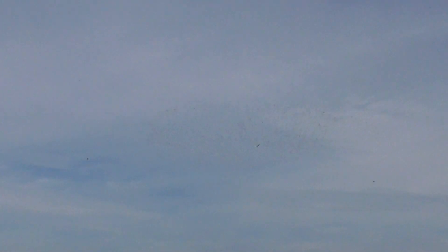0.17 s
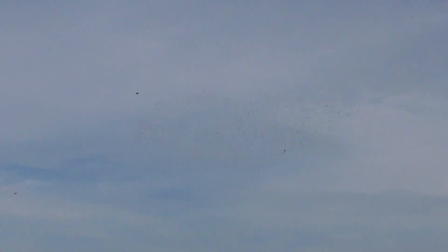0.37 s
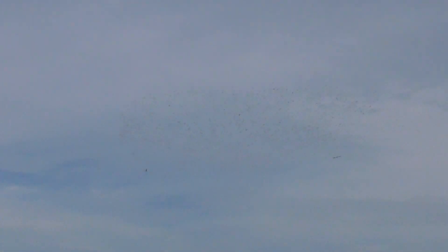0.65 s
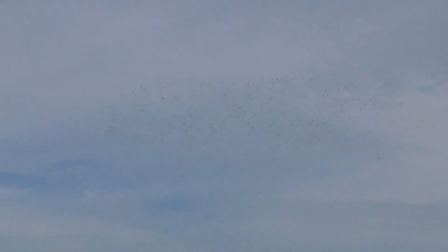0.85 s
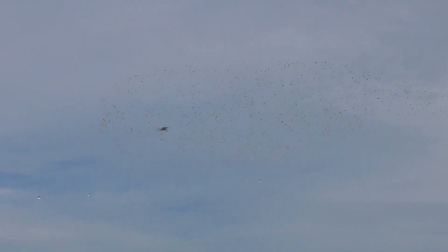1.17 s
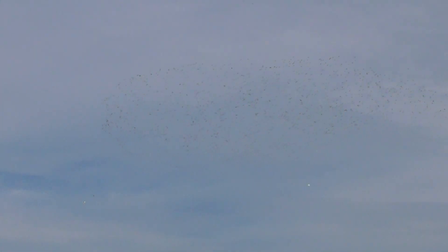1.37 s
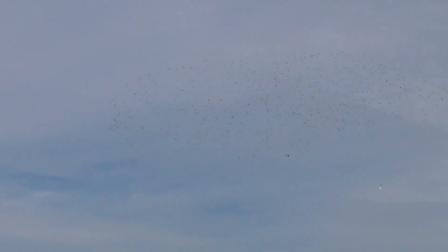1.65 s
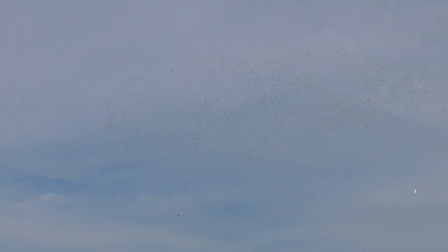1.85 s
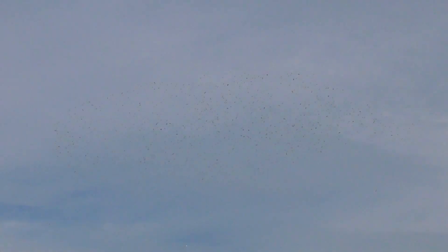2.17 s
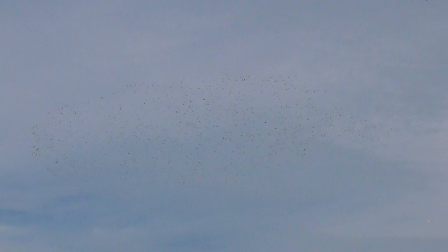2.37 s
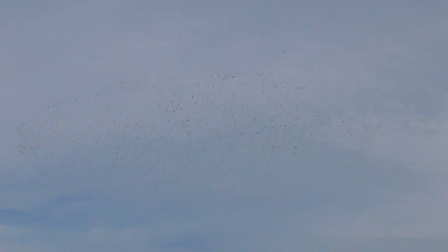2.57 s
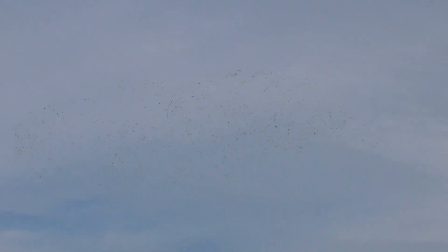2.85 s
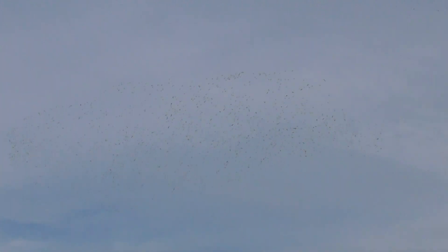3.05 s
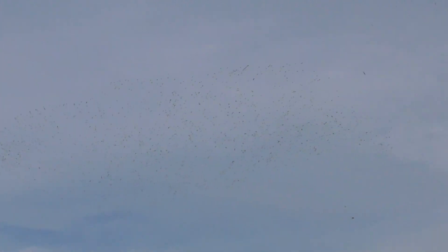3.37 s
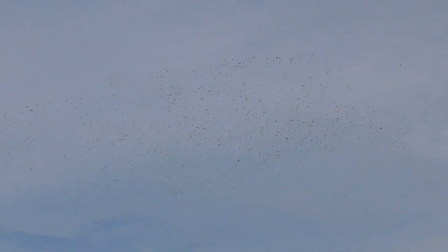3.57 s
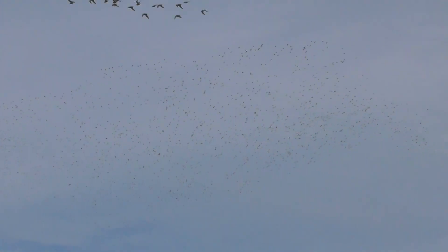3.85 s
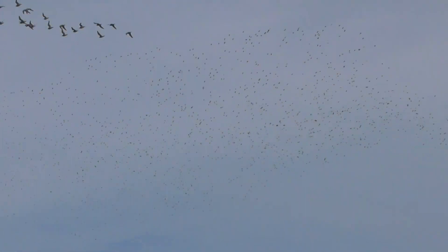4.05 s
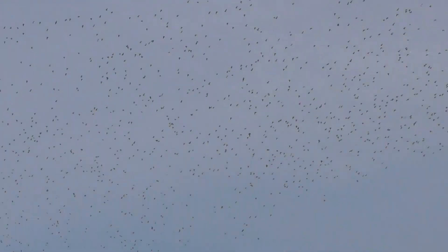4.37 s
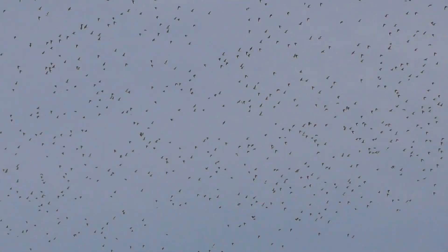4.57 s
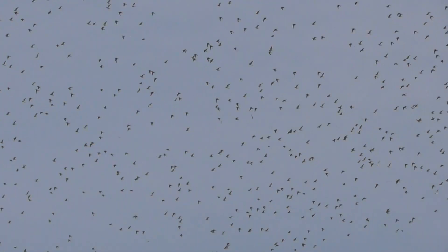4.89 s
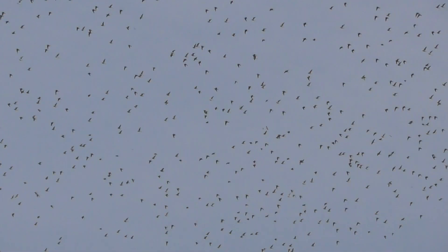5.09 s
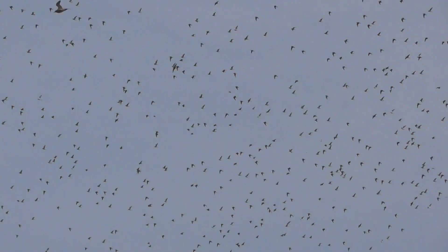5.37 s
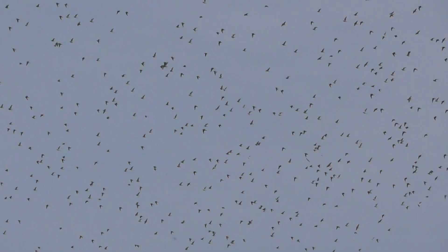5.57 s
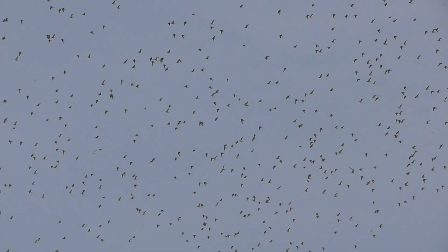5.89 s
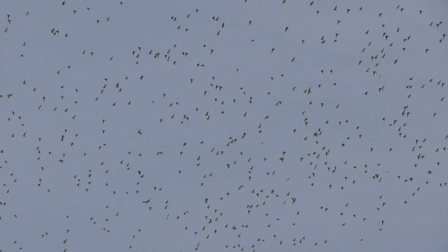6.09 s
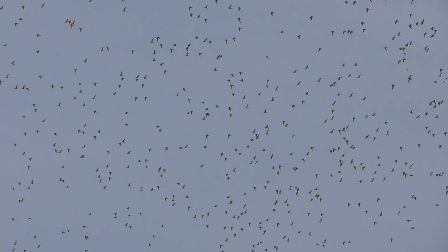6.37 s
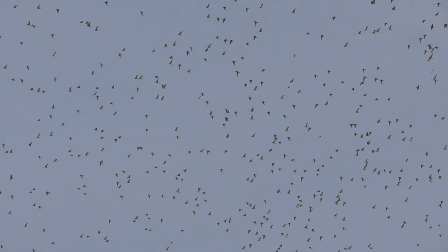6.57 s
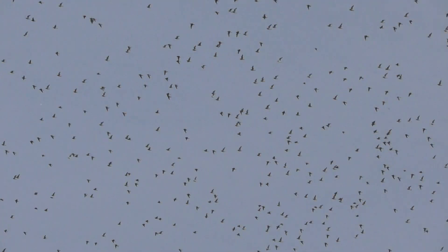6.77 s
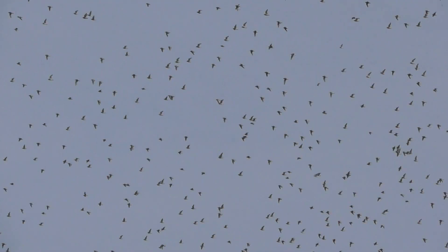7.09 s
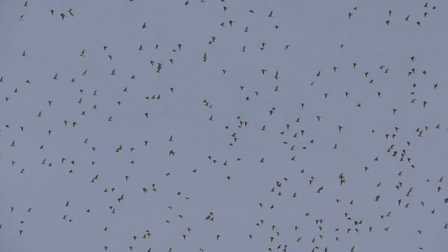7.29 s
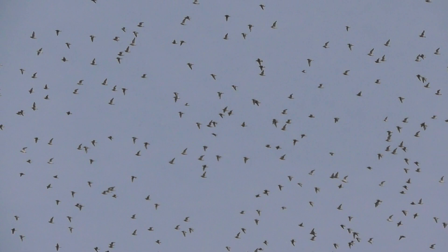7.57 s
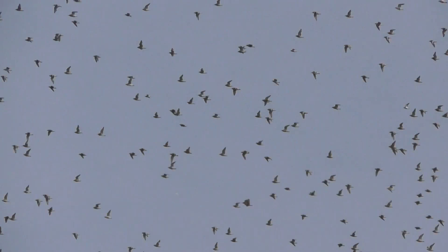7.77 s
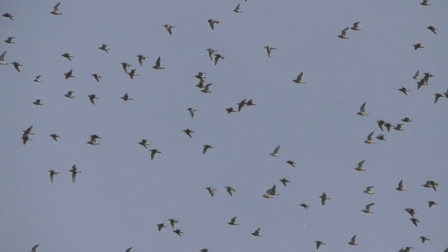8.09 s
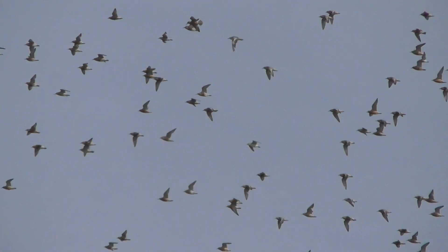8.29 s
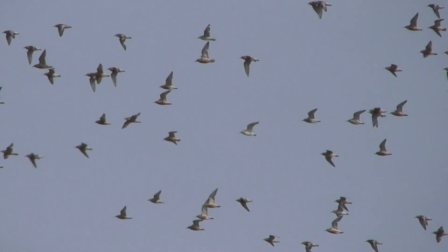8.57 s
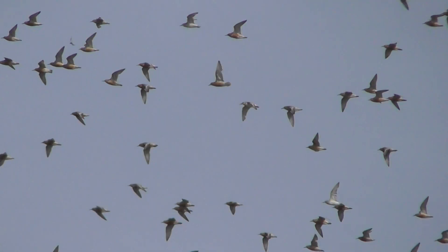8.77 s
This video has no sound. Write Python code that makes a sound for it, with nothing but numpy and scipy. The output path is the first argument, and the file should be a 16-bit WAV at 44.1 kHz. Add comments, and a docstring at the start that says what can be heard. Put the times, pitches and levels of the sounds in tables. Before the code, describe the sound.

An open marsh heard through a handheld stereo microphone, with soft hiss and an airy wash of distant, blurred bird calls throughout. From 0 to 2.5 s wind buffets in strong, low, lumpy gusts with dull one-sided thumps; a very sharp click snaps at 0.1 s, with a cluster of plastic ticks and finger rustle around 1.1-1.7 s. Faint thin whistles and a low trill sit behind. A clear, high piping whistle stands out at 2.7 s. Wind weakens unevenly, with thumps near 3.2-3.7 s; more casing ticks come at 2.9, 3.3 and 4.3-4.9 s, the strongest near 4.8. From 4.5 s calls thicken: a rippling trill at 4.7, overlapping trills and falling whistles at 5.6-6 s, trills around 7 s, purrs at 6.2-8 s. A lone tick sounds at 7.4. Loud bright trills at 8.2 and 8.4 s lead to final whistles; slight high fizz lingers.

```python
"""An open marsh: a flock of shorebirds whistles, trills and purrs above a handheld camera.
Each bird call is a stack of sine waves on a moving pitch; faint far calls and echoes lie behind.
Wind is drifting noise with dull thumps; the camera body ticks as decaying tones and rustles in tiny slips.
An airy marsh wash, microphone hiss and a patchy high fizz are noises of different colours."""
import sys
import numpy as np
from scipy import signal
from scipy.fft import rfft, irfft
from scipy.io import wavfile
from scipy.ndimage import uniform_filter1d

SR = 44100
rng = np.random.default_rng(int(sys.argv[2]) if len(sys.argv) > 2 else 0)


def bounce(signal):
    """Save signal as a 16-bit WAV file at the path given by the first command-line argument."""
    frames = np.transpose(np.atleast_2d(signal))
    limited = np.clip(frames, -1, 1)
    pcm = np.round(limited * 32767).astype(np.int16)
    wavfile.write(sys.argv[1], SR, pcm)


N = 394254  # length in samples

# In every table, left_right_db above 0 means louder on the left.
# gusts of wind: [start_s, level_db before the tint below]
GUSTS = [(0.0, -30), (0.77, -29), (0.97, -34.5), (1.04, -26), (1.34, -30), (1.39, -24), (1.67, -46.5),
         (1.97, -55), (2.06, -34), (2.11, -42), (2.24, -24.5), (2.31, -27), (2.61, -34), (2.76, -56),
         (3.21, -38.5), (3.24, -34), (3.36, -42.5), (3.39, -36.5), (3.78, -28.5), (4.11, -45),
         (4.21, -36.5), (4.58, -42.5), (4.73, -37.5), (5.38, -37.5), (5.4, -47), (5.48, -40), (5.7, -45.5),
         (6.05, -36), (6.25, -45.5), (6.94, -35), (7.42, -35), (7.45, -45), (7.55, -38.5), (7.97, -39.5),
         (8.02, -33), (8.17, -43), (8.71, -41.5), (8.94, -39.5)]
# basic colour of the wind: [pitch_hz, relative level_db per Hz]
WIND_COLOUR = [(8.8, -78), (15, -56), (27, -48), (38, -58), (59, -100), (87, 0), (188, 13.5), (372, 4),
               (754, -10.5), (1210, -30), (2500, -51.5), (3250, -71), (5500, -120)]
# changing tint of the wind: [time_s, deep_bass_lift_db, upper_edge_lift_db]
WIND_TINT = [(0, -18, 12), (1.45, -14, 5), (1.8, 15, 23), (2.4, -11, -1.5), (2.9, 30, 7), (3.6, 6.5, -1.5),
             (4.8, 21, 7.5), (6.0, 16, -12.5), (6.4, 33, -13), (7.0, 28.5, -17), (8.94, 35.5, -16)]
# how alike the wind is at both ports: [pitch_hz, likeness 0-1]
WIND_LIKENESS = [(30, 0.21), (130, 0.97), (290, 0.37), (640, 0.0083), (1500, 0.024)]
WIND_LEFT_RIGHT_DB = 0.46

# colour of the marsh wash: [pitch_hz, relative level_db per Hz]
WASH_COLOUR = [(180, -49), (300, -8), (416, 12), (801, 2.5), (1110, -3), (1230, -11), (1590, 0.5),
               (2200, -7), (3140, -11.5), (4480, -7.5), (5630, -20.5), (7270, -10), (9000, -21),
               (11700, -74), (19800, -120)]
# loudness of the marsh wash: [time_s, level_db]
WASH_LEVEL = [(0, -57), (1.0, -55), (1.3, -52), (1.52, -51), (1.6, -56.5), (2.05, -56.5), (2.5, -54),
              (3.0, -57.5), (3.2, -58.5), (4.2, -59), (4.77, -53.5), (5.45, -58), (5.8, -55), (6.9, -56),
              (7.1, -52), (8.1, -53.5), (8.94, -54)]
# how alike the wash is on left and right: [pitch_hz, likeness 0-1]
WASH_LIKENESS = [(400, 0.44), (1000, 0.83), (1800, 0.97), (4000, 1)]

# colour of the microphone hiss: [pitch_hz, relative level_db per Hz]
HISS_COLOUR = [(2350, -71), (4000, -65), (7910, -12), (8250, -3.5), (9280, 1.5), (13200, 0), (15800, 1.5),
               (16200, -21), (16500, -36)]
HISS_START_DB, HISS_RISE_DB_PER_S = -65.5, 0.1

# loudness of the high fizz: [time_s, level_db]
FIZZ_LEVEL = [(0, -78), (4.5, -77), (5.5, -77), (6.5, -72), (7.2, -68.5), (7.8, -72), (8.4, -69),
              (8.94, -70)]
FIZZ_HZ, FIZZ_WIDTH_HZ = 13300, 800

# near whistles: [start_s, length_s, middle_pitch_hz, start_to_end_glide_hz, level_db, octave_overtone_db]
WHISTLES = [(0.002, 0.053, 2350, 208, -51.5, -35), (0.024, 0.11, 3200, -130, -53, -23),
            (0.28, 0.052, 3330, 2, -60, -25), (0.425, 0.049, 2480, 60, -65, -25),
            (0.514, 0.016, 2840, -40, -58, -25), (0.845, 0.042, 3300, 30, -64, -30),
            (0.965, 0.027, 3930, -50, -58, -30), (1.088, 0.023, 4330, 52, -54, -30),
            (1.206, 0.03, 3370, -100, -58, -30), (1.45, 0.04, 4180, -200, -59, -30),
            (0.376, 0.07, 3350, -200, -58, -21), (0.769, 0.15, 3070, 55, -60.5, -22),
            (1.484, 0.12, 3240, -38, -62, -23), (1.774, 0.067, 3410, -42, -62.5, -5),
            (2.672, 0.11, 3110, -13, -43, -12), (3.152, 0.13, 3800, -200, -70, -30),
            (3.58, .05, 2400, 150, -65, -30), (3.468, 0.16, 3260, -19, -61, -9),
            (3.682, 0.18, 3340, -140, -60, -11), (4.278, 0.12, 3090, -150, -61, -30),
            (4.907, .07, 4650, -500, -68, -28), (4.44, 0.13, 3420, -27, -60.5, -8),
            (4.66, 0.21, 3020, -190, -54.5, -30), (4.898, 0.042, 2280, -150, -66, -30),
            (4.884, 0.19, 3220, -120, -58, -31), (5.107, 0.14, 2310, 172, -62, -23),
            (5.15, 0.039, 3470, 60, -60, -25), (5.135, 0.035, 5120, -150, -62, -26),
            (5.287, 0.048, 2250, 195, -56.5, -20), (5.443, 0.12, 3410, 170, -62, -32),
            (5.659, 0.17, 2670, -420, -51, -12), (5.854, 0.097, 2237, 123, -52, -8),
            (5.905, 0.19, 3195, -230, -50.5, -17), (6.281, 0.14, 2720, -160, -55.5, -19),
            (6.564, 0.11, 2910, -350, -63, -28), (6.565, 0.13, 3420, -91, -57, -33),
            (6.687, 0.074, 3030, -450, -60, -31), (6.714, 0.085, 4720, 148, -69, -30),
            (6.797, 0.12, 3780, -350, -74, -30), (7.098, 0.14, 3130, -57, -53, -26),
            (7.168, 0.073, 2700, -180, -55, -10), (7.484, 0.13, 2580, 31, -59.5, -13),
            (7.735, 0.16, 3490, -22, -53.5, -22), (7.9, 0.053, 2860, -130, -56, -30),
            (7.969, 0.115, 2990, -220, -59, -32), (7.987, 0.041, 3590, -100, -56, -15),
            (8.145, 0.05, 2870, -170, -54, -32), (8.222, 0.13, 2820, -250, -53.5, -9),
            (8.613, 0.12, 3330, -150, -53.5, -31), (8.706, 0.072, 4380, -60, -71, -29),
            (8.732, 0.083, 2870, 18, -59, -32)]
LEAD_S = .022  # low lead-in before each whistle
ARCH = .045  # share of the pitch by which whistle ends sag, up to 0.16 s long; longer ones are flatter
WAVER_DB_PER_DB = 0.11  # fainter near whistles waver more

# usual pitches of far whistlers: [pitch_hz]
FAR_PITCHES = np.array([1900, 2400, 2800, 3200, 3300, 3600, 4400])
FAR_WHISTLES_PER_S, FAR_WHISTLE_BASE_DB = 260, -73
FAR_TRILLS, FAR_TRILL_BASE_DB = 40, -67
FAR_PURRS, FAR_PURR_BASE_DB = 60, -70

# camera ticks: [start_s, sharp_peak_db, hollow_over_sharp_db, shell_over_sharp_db, left_right_db]
TICKS = [(0.081, -12, -22.5, -22, -1), (0.165, -53, 17, 20, 0.1), (0.6976, -70.5, 35, 22, 0),
         (1.114, -21, -6.5, -3.5, -2), (1.1751, -28.5, -10, -3.5, 0.1), (1.213, -43, -11, -8, -1),
         (1.327, -37, -15, -4, 1), (1.3463, -37, -12, -14, 2), (1.3727, -25.5, -29, -21, 0.5),
         (1.3827, -36, -20, -20, 1), (1.648, -42, -8, 11, 0.5), (1.665, -41, -22, 2, -1),
         (2.15, -32.5, -13, 0.5, -4.0), (2.1958, -43, 6, 4, -5), (2.612, -37.5, -3, 5, -3.5),
         (2.9169, -29.5, -5.5, 3.5, -2.5), (3.301, -28.5, -8.5, -4, -3.5), (3.319, -43, -14, -5, -4),
         (4.3236, -28.5, -4.5, 3.5, -3), (4.3585, -41, -5, 3, -1), (4.4138, -42, -12, -19, -7),
         (4.5322, -41.5, -20, -3, -7), (4.653, -40, -19, -1, 2), (4.7484, -40, 1, -4, 8),
         (4.7745, -40, -16, -9, 2), (4.7877, -22, -1, -6.5, -4), (4.8968, -45, -18, -11, -3),
         (7.4139, -30, 4.5, 11, -3.5)]
# ringing tones of the camera body: [pitch_hz, level_db, time_to_fall_60_db_s, part: 0 sharp, 1 hollow, 2 shell]
BODY_TONES = [(6500, -9, .007, 0), (7550, 0, .011, 0), (8450, -5, .008, 0), (9900, -15, .004, 0),
              (13000, -22, .003, 0), (660, -7, .03, 1), (830, 0, .038, 1), (1080, -6, .02, 1),
              (1750, -2, .015, 2), (2020, 0, .018, 2), (2800, -1, .015, 2), (3300, -4, .012, 2),
              (3800, -2, .015, 2), (4670, -2, .016, 2)]
HOLLOW_RISE_S = 0.0015

# near trills: [start_s, notes, note_period_s, held_pitch_hz, last_note_hz, level_db,
#               brightness_db per overtone, third_overtone_lift_db, rasp 0-1]
TRILLS = [(.133, 1, 0.14, 1806, 1825, -60, -4.5, 1, 0.34),
          (.780, 7, 0.033, 1920, 1680, -62.5, -0.8, 8, 0.3),
          (1.091, 6, 0.03, 1495, 1434, -52, -11.5, 11, 0.43),
          (2.155, 7, 0.031, 1910, 1700, -64, 1.5, -1, 0.05),
          (4.655, 7, 0.031, 1907, 1736, -53.5, -3.5, 0, 0.07),
          (5.632, 7, 0.034, 1503, 1426, -54, -5.5, 7, 0.3),
          (5.644, 8, 0.0322, 1955, 1704, -49, -3.5, 0, 0.21),
          (6.69, 1, 0.042, 1300, 1320, -54, -4, -3, 0.1), (6.926, 8, .0335, 1897, 1590, -52, -3.5, 2, 0.05),
          (7.250, 7, 0.025, 1507, 1425, -58, -1.5, 6.5, 0.26),
          (8.196, 7, 0.0327, 1935, 1628, -44.5, -3.5, -4.5, 0.06),
          (8.427, 7, 0.029, 1353, 1244, -47.5, -2.5, -3, 0.4)]
# basic strengths of a trill's overtones, from the lowest tone up: [level_db]
TRILL_OVERTONES = [-15.5, -2.5, -5, -5, -16]
CLIMB, SAG_POWER = 0.208, 4.2  # the first note sits this share of the final drop low; the drop comes late
UNEVEN = .04  # typical share of a period by which notes come early or late
CRACK = .12  # share of the pitch by which the last note starts too high
TRILL_FADE_DB, TRILL_DULL_DB = 0.5, -1  # fade, and brightness change per overtone, over the trill
SLIDE_FADE_DB_PER_SHARE = 35  # a note fades as it slides down

# hard eddies of wind: [start_s, peak_db, left_right_db]
THUMPS = [(0.241, -31, -11), (0.286, -27, -6), (0.398, -45, 0.1), (0.477, -37, -3), (0.649, -24, 2),
          (1.086, -46, .5), (1.463, -23, 10), (2.078, -35, -5), (2.384, -32, -2), (3.234, -26.5, -3),
          (3.602, -29.5, 9), (3.729, -26.5, 10), (5.342, -40, -1), (6.154, -34.5, 4), (6.604, -31, 8),
          (6.655, -31.5, 9), (6.725, -34, 8)]

# near purrs: [start_s, length_s, low_pitch_hz, level_db]
PURRS = [(4.5, 0.16, 2600, -51), (0.29, 0.1, 3900, -61), (1.17, 0.09, 3700, -56), (1.25, 0.22, 2700, -62),
         (0.56, 0.074, 1570, -54.5), (0.99, 0.11, 2800, -59), (4.491, 0.31, 1570, -64),
         (6.233, 0.31, 1520, -58.5), (6.814, 0.31, 1770, -59), (7.503, 0.48, 1550, -57.5)]
CHIRPS_PER_S, CHIRP_RISE_HZ = 57, 604  # the rise is reached 0.7 of the way through a chirp period

# fingers shifting their grip: [start_s, length_s, level_db]
RUBS = [(1.17, 0.067, -74), (1.31, 0.16, -62), (1.447, 0.073, -53.5), (2.12, 0.26, -65), (2.56, 1, -70),
        (4.276, 0.73, -62.5), (6.388, 0.09, -65)]

# how far the left port leads the right: [pitch_hz, lead in radians]
PORT_LEAD = [(300, 0), (600, -.5), (1500, 0), (8500, 0), (10500, 2.4), (11600, 2.3), (13300, .5),
             (15000, 1.1)]
TREBLE_LIMIT_HZ = 15830


def amp(db):
    """Turn decibels into a plain multiplier."""
    return 10 ** (np.asarray(db) / 20)


def evened(x):
    """Scale a signal to an average strength (rms) of 1."""
    return x / np.sqrt(np.mean(x ** 2) + 1e-20)


def smoothed(x, *sizes, axis=-1):
    """Smooth by one running average after another."""
    for size in sizes:
        x = uniform_filter1d(x, size=size, axis=axis)
    return x


def read(points, hz):
    """Read a table between its points on a musical (logarithmic) pitch scale."""
    f, value = np.transpose(points)
    return np.interp(np.log(hz + 1), np.log(f + 1), value)


def along(table, column, t):
    """Read one column of a table between its times."""
    columns = np.transpose(table)
    return np.interp(t, columns[0], columns[column])


def add(mix, s, sound, left_right_db=-0.8):
    """Place a sound at s seconds, trimmed to fit and shared between left and right."""
    at = round(s * SR)
    part = mix[:, max(at, 0):at + len(sound)]
    sides = amp([[left_right_db / 2], [-left_right_db / 2]])
    part += sound[max(-at, 0):][:part.shape[1]] * sides


def colour(points, hz):
    """Scale a spectrum so that noise made from it has rms 1."""
    db = read(points, hz)
    return db - 10 * np.log10(np.sum(amp(db) ** 2) * 2 / 3)


def noise(field_db, likeness, size, patchy_db, flicker_db):
    """Two-port noise shaped over pitch and time, with drifting patches and broad flicker."""
    frames, hz = 4 * N // size + 5, np.fft.rfftfreq(size, 1 / SR)
    a, b, c, d, patches = rng.standard_normal((frames, len(hz), 5)).T
    patches = smoothed(patches, 6, axis=0)
    patches = evened(smoothed(patches, 8, axis=1))
    flicker = evened(smoothed(rng.standard_normal(frames), 3))
    same = np.clip(likeness(hz), -1, 1)[:, None]
    left = a + 1j * b
    right = same * left + np.sqrt(1 - same ** 2) * (c + 1j * d)
    t = np.arange(frames) * size / 4 / SR
    level_db = field_db(hz[:, None], t) + patchy_db * patches + flicker_db * flicker
    ports = np.array([left, right]) * amp(level_db)
    return signal.istft(ports, nperseg=size, noverlap=size * 3 // 4)[1][:, :N]


def wind():
    """Eddies buffet the ports: deep noise stays smooth while the rest swells in quick lumps."""
    def field(hz, t):
        octaves = np.log2((hz + 1) / 200)
        bright_db = along(WIND_TINT, 2, t) * np.clip(octaves / 3.94, 0, 1.4)
        deep_db = along(WIND_TINT, 1, t) * np.clip(-octaves / 2.45, 0, 1)
        return colour(WIND_COLOUR, hz) + along(GUSTS, 1, t) + bright_db + deep_db
    rush = noise(field, lambda hz: read(WIND_LIKENESS, hz), size=1024, patchy_db=1.5, flicker_db=1.0)
    lumps = evened(smoothed(rng.standard_normal(N), 300, 200))
    deep = signal.sosfiltfilt(signal.butter(3, 115, fs=SR, output="sos"), rush)
    sides_db = WIND_LEFT_RIGHT_DB * np.array([[.5], [-.5]])
    return deep + (rush - deep) * amp(2.79 * lumps + sides_db)


def marsh():
    """Wings, water and far calls blur into one noise wash, its treble nearly the same on left and right."""
    def field(hz, t):
        return colour(WASH_COLOUR, hz) + along(WASH_LEVEL, 1, t)
    return noise(field, lambda hz: read(WASH_LIKENESS, hz), size=512, patchy_db=2.5, flicker_db=1.1)


def hiss():
    """Each microphone adds almost wholly its own hiss, which creeps up slowly."""
    def field(hz, t):
        return colour(HISS_COLOUR, hz) + HISS_START_DB + HISS_RISE_DB_PER_S * t
    return noise(field, lambda hz: 0.036 + 0 * hz, size=512, patchy_db=0.0, flicker_db=1.8)


def fizz():
    """A narrow band of high noise comes and goes in patches."""
    band = [(0, -90), (FIZZ_HZ - 2 * FIZZ_WIDTH_HZ, -40), (FIZZ_HZ - FIZZ_WIDTH_HZ, -5), (FIZZ_HZ, 0),
            (FIZZ_HZ + FIZZ_WIDTH_HZ, -5), (FIZZ_HZ + 3 * FIZZ_WIDTH_HZ, -25), (SR / 2, -60)]

    def field(hz, t):
        return colour(band, hz) + along(FIZZ_LEVEL, 1, t)
    return noise(field, lambda hz: 0.5 + 0 * hz, size=512, patchy_db=2.5, flicker_db=4.5)


def voice(hz, overtones_db, waver_db):
    """A bird's voice box sounds a pitch and its overtones; turbulent air makes each one waver."""
    turn = 2 * np.pi * (np.cumsum(hz) / SR + rng.random())
    waver = rng.standard_normal((len(overtones_db), len(hz) + 600))
    waver = evened(smoothed(waver, 300))[:, 300:-300]
    tones = [amp(db + waver_db * waver[k]) * np.sin((k + 1) * turn) for k, db in enumerate(overtones_db)]
    return np.sqrt(2) * sum(tones)


def whistle(length, pitch_hz, glide_hz, db, octave_db, waver_db=2.0, arch=None):
    """A soft low lead-in jumps up to an arched note that drops off at the end."""
    t = np.arange(-LEAD_S, length + .017, 1 / SR)
    u = np.clip(2 * t / length - 1, -1, 1)  # -1 at the start of the note, 1 at its end
    if arch is None:
        arch = ARCH * min(.16 / length, 1) ** 3
    lead = (-t / LEAD_S).clip(0)
    drop = ((t - length + 0.00352) / 0.01596).clip(0)
    hz = pitch_hz * (1 - arch * abs(u) ** 2.8) + glide_hz / 2 * u
    hz *= 1 - .32 * lead ** .45 - .3 * drop ** 1.3
    swell_db = -3.0 * u ** 2 - 9.0 * lead ** .45 - 7 * drop
    tone = voice(hz, [0, octave_db, 2 * octave_db], waver_db)
    return amp(db + swell_db) * tone * signal.windows.tukey(len(t), .08)


def far_flock(out):
    """Many faint calls at random times, deep in the flock."""
    for when, long, pitch, rise, fall, loud, side in rng.random((round(FAR_WHISTLES_PER_S * N / SR), 7)):
        hz = FAR_PITCHES[int(pitch * len(FAR_PITCHES))] * (.88 + .24 * side)
        s = when * N / SR
        swell_db = .9 * (along(WASH_LEVEL, 1, s) + 54)  # the far calls swell with the wash
        air_db = -12 * max(hz / 3000 - 1, 0) * 1.1  # air dulls high calls
        db = FAR_WHISTLE_BASE_DB + 7 * loud + swell_db + air_db
        glide_hz = hz * (.08 * rise - .14 * fall)
        call = whistle(.02 + .11 * long ** 2, hz, glide_hz, db, -22, 4.0, .04 * rise + .07 * fall)
        add(out, s, call, 6 * rise - 4)
    for when, long, pitch, loud in rng.random((FAR_TRILLS, 4)):
        hz = 1350 + 600 * pitch
        call = trill(3 + 5 * long, .032, hz, .9 * hz, FAR_TRILL_BASE_DB + 5 * loud, -3, 2, .5)
        add(out, when * N / SR, call)
    for when, long, pitch, loud in rng.random((FAR_PURRS, 4)):
        db = FAR_PURR_BASE_DB + 5 * loud - 4 * pitch
        call = purr(.06 + .15 * long, 2000 + 2200 * pitch ** 1.5, db)
        add(out, when * N / SR, call, 6 * long - 4)


def flock():
    """Near and far callers, plus a dying blur of echoes off the flats."""
    out = np.zeros((2, N))
    for s, length, pitch_hz, glide_hz, db, octave_db in WHISTLES:
        waver_db = np.clip(WAVER_DB_PER_DB * (-41 - db), .4, 3.5)
        add(out, s - LEAD_S, whistle(length, pitch_hz, glide_hz, db, octave_db, waver_db), -1.3)
    for s, *call in TRILLS:
        add(out, s, trill(*call))
    for s, *call in PURRS:
        add(out, s, purr(*call))
    far_flock(out)
    both, own = rng.standard_normal(8000), rng.standard_normal((2, 8000))
    echoes = (both + 0.5 * own) * amp(-60 * np.arange(8000) / SR / 0.39)  # falls 60 dB in 0.39 s
    echoes /= np.linalg.norm(echoes[0])
    return out + amp(-12) * signal.oaconvolve(out, echoes, axes=1)[:, :N]


def camera():
    """A short snap strikes the shell; the grip shifts its tones and lets each ring more or less."""
    out, t = np.zeros((2, N)), np.arange(2400) / SR
    for s, peak_db, hollow_db, shell_db, left_right_db in TICKS:
        blow = rng.standard_normal(500) * np.exp(-t[:500] / .0009) * np.clip(t[:500] / .0005, 0, 1)
        grip, ring = rng.standard_normal((len(BODY_TONES), 2)), np.zeros(len(t))
        for part, part_db in enumerate([0, hollow_db, shell_db]):
            tones = np.zeros(len(t))
            for (hz, db, t60, tone_part), (shift, looseness) in zip(BODY_TONES, grip):
                if tone_part == part:
                    fading = amp(db + 2.5 * looseness - 60 * t / t60)
                    tones += fading * np.sin(2 * np.pi * hz * (1 + .02 * shift) * t)
            if part == 1:  # the hollow part answers the slower push behind the snap
                rung = tones * (1 - np.exp(-(t / HOLLOW_RISE_S) ** 2))
            else:
                rung = np.convolve(blow, tones)[:len(t)]
            ring += amp(peak_db + part_db) * rung / abs(rung).max()
        # the dry snap itself, with a short scattered tail
        snap = rng.standard_normal(len(t)) * amp(-60 * t / 0.071)
        snap = signal.lfilter([0.19, -0.82, -0.4, -0.95], [1], snap)
        ring += amp(peak_db + max(shell_db, -20) - 16.5) * snap
        add(out, s, ring, left_right_db)
    return out


def trill(notes, period, held_hz, last_hz, db, bright_db, third_db, rasp):
    """Notes hold, slide down and break off; the first climbs in, later ones start sharp, high ones slide most."""
    notes = round(notes)
    count = np.arange(0, notes, 1 / (period * SR))
    uneven = UNEVEN * np.r_[0, rng.standard_normal(20)]
    count = np.interp(count, np.arange(21) + uneven, np.arange(21)).clip(0, notes - 1e-6)
    note = count.astype(int)
    since, left = count % 1 * period, (1 - count % 1) * period  # seconds into the note and still to go
    progress, done = note / max(note[-1], 1), count / count[-1]
    note_hz = held_hz - (held_hz - last_hz) * (progress ** SAG_POWER + CLIMB * (note == 0))
    strain = np.clip((note_hz - 1300) / 250, .15, 1)  # higher notes bend more
    start = np.where(note == 0, -.15 * np.exp(-since / 0.00744), 0.016 * np.exp(-since / 0.00286))
    crack = CRACK * progress ** 4 * np.exp(-(since / .004) ** 2)
    slide = .15 * np.clip((.012 - left) / .007, 0, 1.5) ** 1.6
    hz = note_hz * (1 + strain * (start - slide) + crack)
    gate = np.clip(since / .0015, 0, 1) * np.clip((left - .004) / .005, 0, 1)
    tilt_db = bright_db - TRILL_DULL_DB * done
    overtones_db = [o + tilt_db * (k - 1) + third_db * (k == 2) for k, o in enumerate(TRILL_OVERTONES)]
    husk = evened(smoothed(rng.standard_normal(len(note)), 24, 9))
    husk *= .5 + 2.5 * np.exp(-since / 0.0058)  # air tears as each note opens
    shimmer = 1 + np.clip(rasp, 0, 1) * (husk - 1)
    level_db = db - TRILL_FADE_DB * done - SLIDE_FADE_DB_PER_SHARE * strain * slide
    return amp(level_db) * gate * shimmer * voice(hz, overtones_db, waver_db=2.0)


def thumps():
    """A hard eddy slaps the ports, mostly one-sided: a sudden dull puff of noise."""
    out, t = np.zeros((2, N)), np.arange(1300) / SR
    dull = signal.butter(4, [200, 750], "band", fs=SR, output="sos")
    for s, db, left_right_db in THUMPS:
        puff = rng.standard_normal(len(t)) * amp(-60 * t / 0.029) * np.clip(t / 0.0024, 0, 1)
        puff = signal.sosfilt(dull, puff)
        add(out, s, amp(db) * puff / abs(puff).max(), left_right_db)
    return out


def purr(length, low_hz, db):
    """Quick upward chirps run together."""
    t = np.arange(0, length, 1 / SR)
    u = t * CHIRPS_PER_S % 1  # how far through the chirp, 0-1
    gate = np.sin(np.pi * np.clip(u / 0.85, 0, 1)) ** 2
    tone = voice(low_hz + CHIRP_RISE_HZ * u / .7, [0], waver_db=4.5)
    return amp(db) * gate * tone * signal.windows.tukey(len(t), .3)


def rustle():
    """Fingers creep over the shell: tiny random slips ring its sharp tones."""
    sizes = amp(3 * np.minimum(rng.exponential(1, N), 5))
    slips = sizes * (rng.random(N) < 800 / SR) * rng.choice([-1, 1], N)  # about 800 a second
    t = np.arange(500) / SR
    tones = sum(amp(db - 60 * t / (.3 * t60)) * np.sin(2 * np.pi * hz * t)
                for hz, db, t60, part in BODY_TONES if part == 0)
    level = np.zeros((2, N))
    for s, length, db in RUBS:
        add(level, s, amp(db) * signal.windows.tukey(round(length * SR), .6), 0)
    return level * evened(signal.oaconvolve(slips, tones)[:N])


def scene():
    """All the sounds of the marsh and the camera together."""
    return wind() + marsh() + hiss() + fizz() + flock() + camera() + thumps() + rustle()


def record(dry):
    """The two ports fall out of step, most in the treble; a low cut, then a treble limit."""
    turn = np.exp(-1j * read(PORT_LEAD, np.fft.rfftfreq(N, 1 / SR)))
    ports = np.array([dry[0], irfft(rfft(dry[1]) * turn, N)])
    cut = signal.sosfilt(signal.butter(2, 45, "high", fs=SR, output="sos"), ports)
    limit = signal.firwin(511, TREBLE_LIMIT_HZ, window=("kaiser", 9), fs=SR)
    return signal.oaconvolve(cut, limit[None], "same")


dry = scene()
out = record(dry)
bounce(out)
```